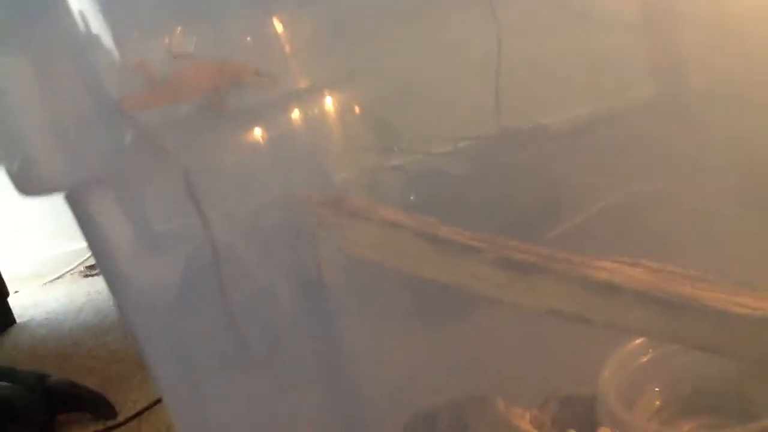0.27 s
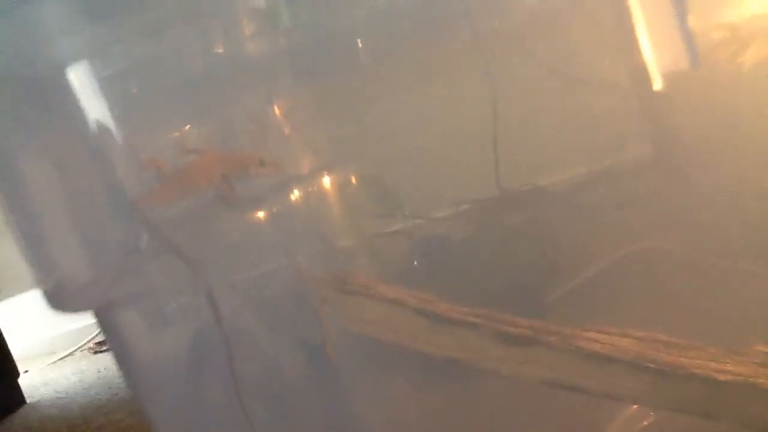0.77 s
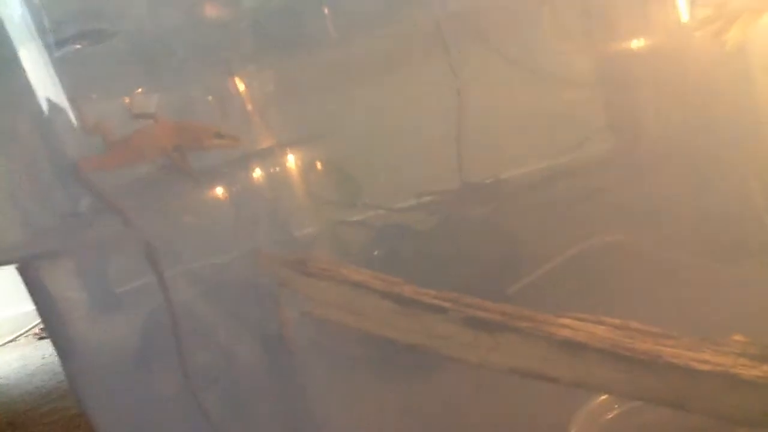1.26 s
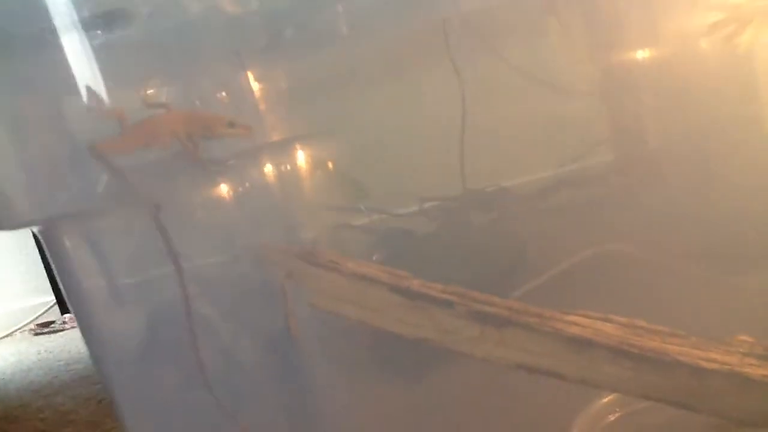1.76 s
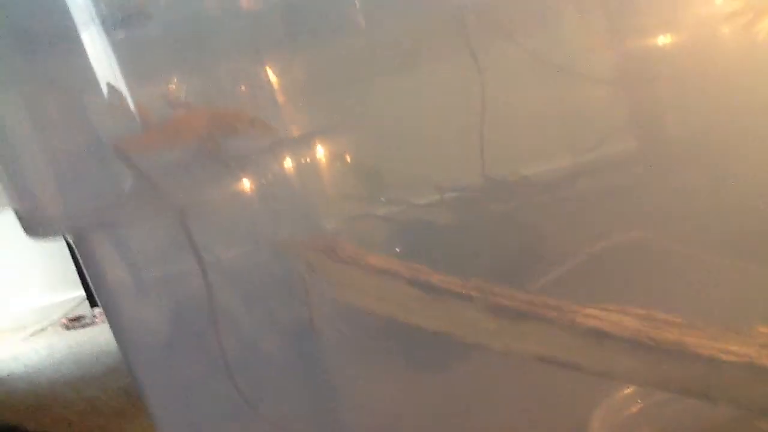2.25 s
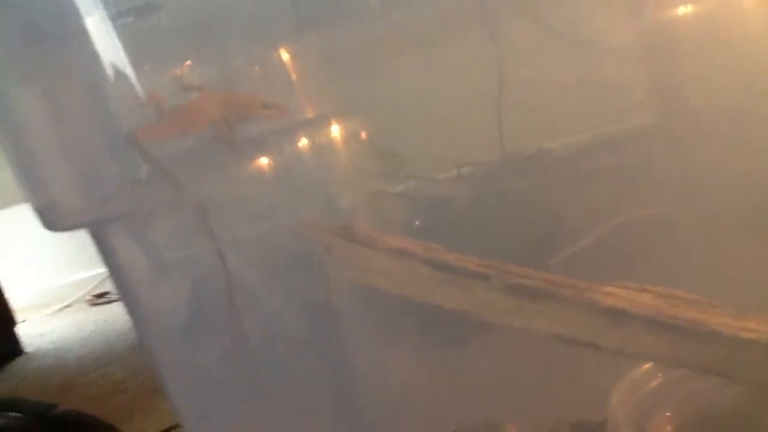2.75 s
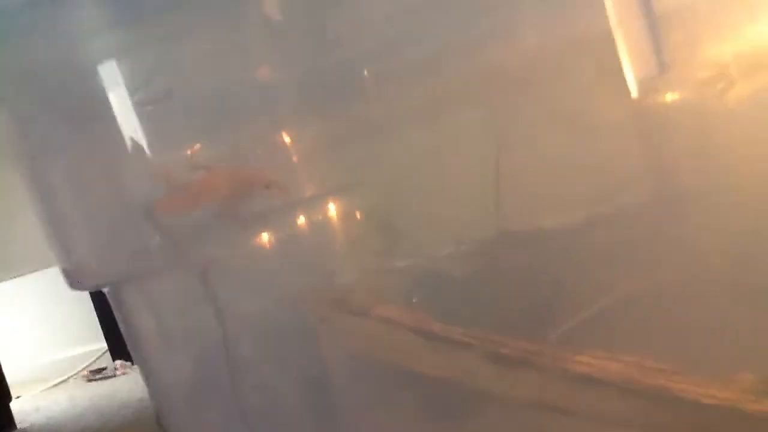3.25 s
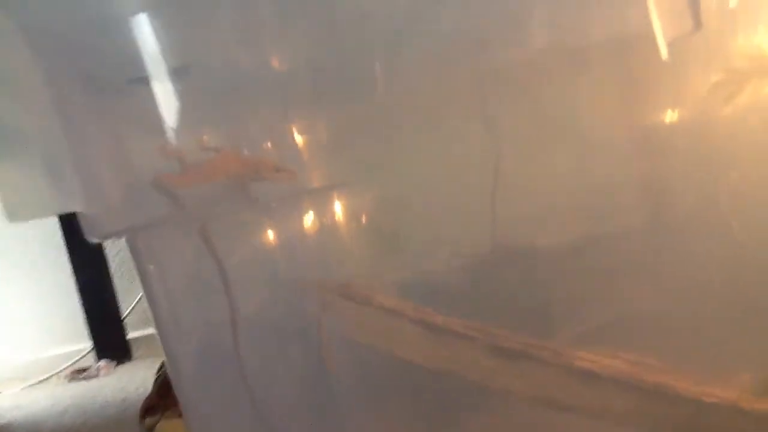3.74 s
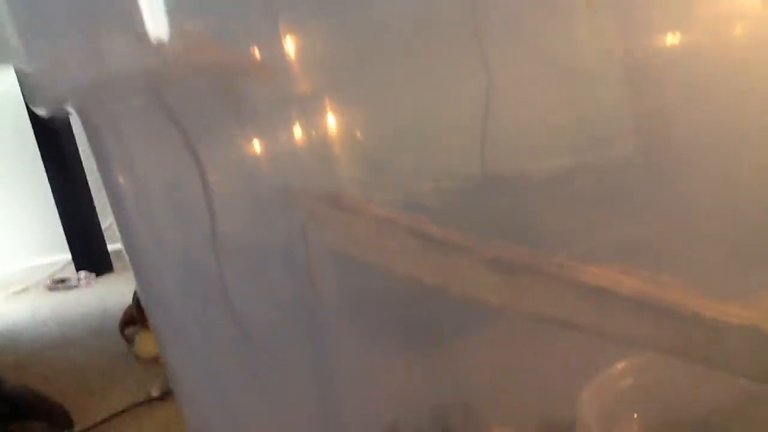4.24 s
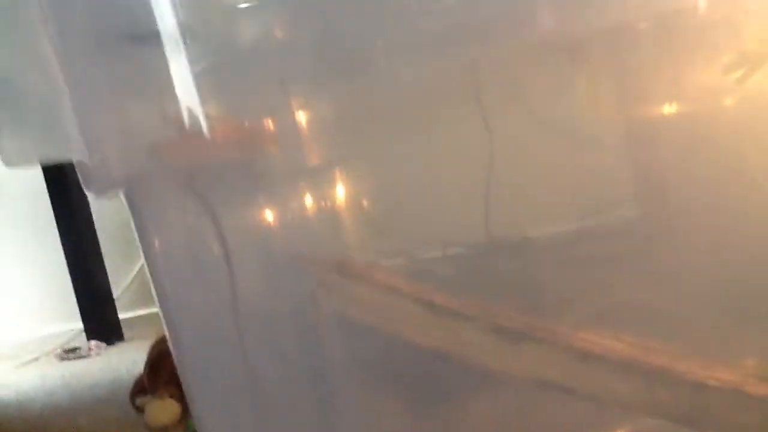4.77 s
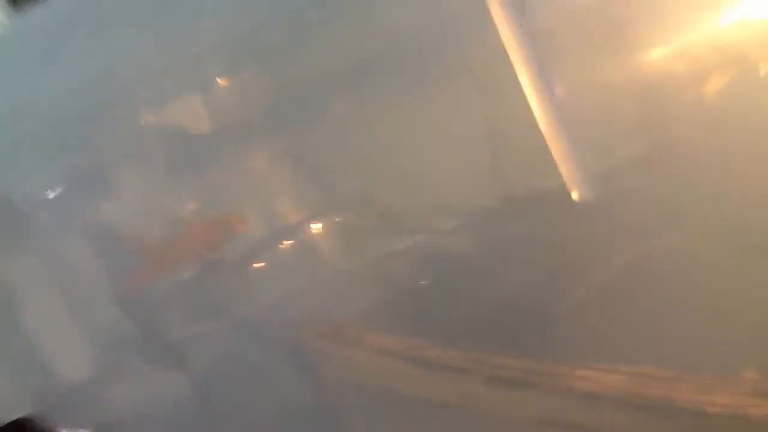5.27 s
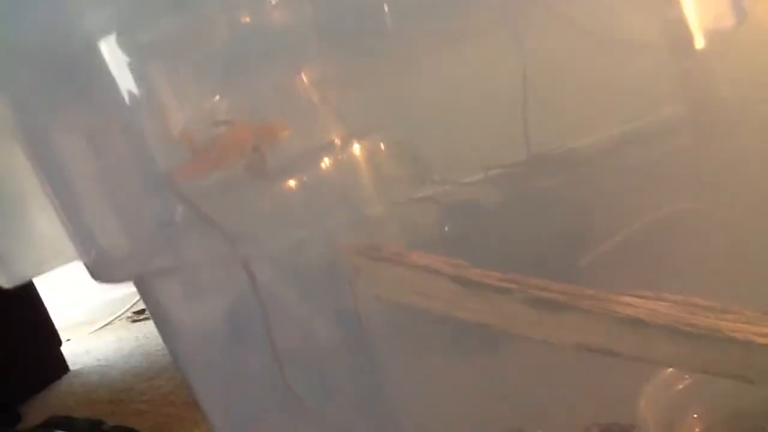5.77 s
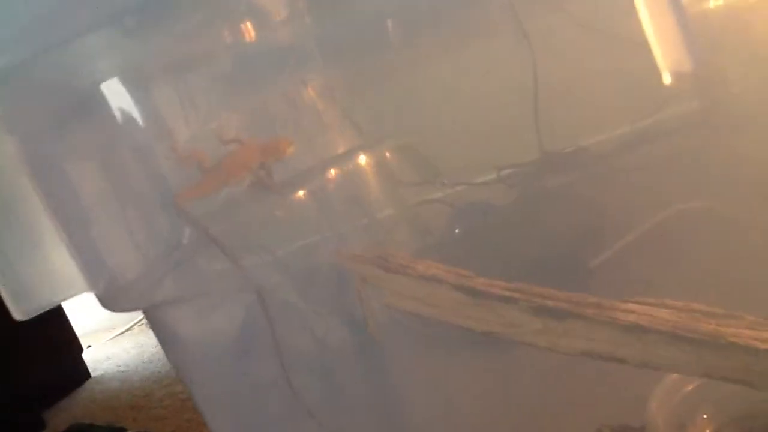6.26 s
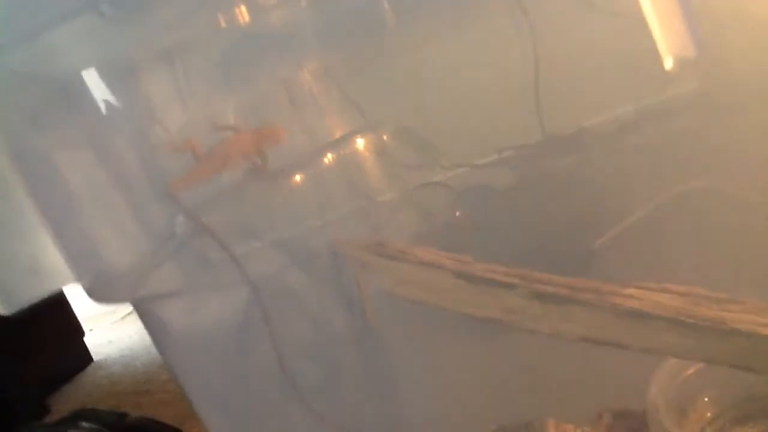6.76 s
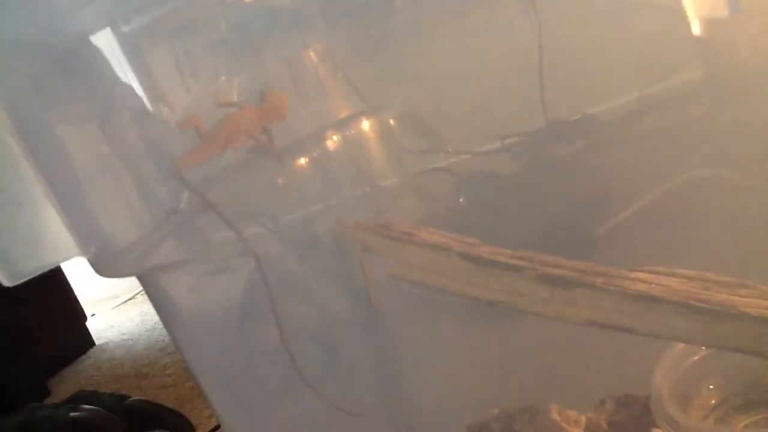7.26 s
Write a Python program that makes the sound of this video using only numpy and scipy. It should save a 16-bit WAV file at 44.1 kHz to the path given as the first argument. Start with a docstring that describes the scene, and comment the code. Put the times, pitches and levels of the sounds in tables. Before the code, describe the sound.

Very close handling noise indoors. After a nearly silent second with tiny plastic taps and two stubby groans, fingers rub the casing in uneven bassy strokes full of crackling slips and dull pops. Hard bumps land early and midway, the middle one with a swishing hiss as a finger crosses the microphone opening. Light brushing, crisper scrapes and another hard thump follow, settling to sparse thin ticks over faint room hiss.

```python
"""Quiet room hum and hiss, light taps and two groans of a finger on plastic; then fingers shift on a small
camera held against a plastic tub, indoors. Skin drags over the casing in countless tiny slips (filtered
random pulses and noise); single slips snap and the casing bumps, all ringing one low resonance.
A fingertip slides over the microphone port, so the hiss sweeps; brushes and squeaks are shaped noise."""
import sys
import numpy as np
from scipy import signal
from scipy.fft import rfft, irfft, next_fast_len
from scipy.io import wavfile
from scipy.ndimage import map_coordinates

SR = 44100
rng = np.random.default_rng(int(sys.argv[2]) if len(sys.argv) > 2 else 0)


def store_wav(level_fs):
    """Save 16-bit WAV to argv[1]."""
    pcm = np.round(np.clip(np.atleast_2d(level_fs), -1, 1) * 32767)
    wavfile.write(sys.argv[1], SR, pcm.T.astype(np.int16))


N = 331455
TIME_S = np.arange(N) / SR
CASE_HZ, CASE_Q, LEAK_HZ = 159, 2, 223  # casing resonance; high-pass leak of the push
QUIET_DB = -63  # room background, rms
TOP_HZ = 15300  # band limit

# room background spectrum: [f/Hz, relative level/dB]
QUIET_SPECTRUM = [(18, -73.5), (30, -34.5), (59, -25), (85, 0), (114, -4.5), (173, 4), (945, -12.5),
                  (1140, -12), (1680, -12.5), (2070, -12.5), (3150, -15.5), (5450, -14.5), (15500, -14)]
# the room background falls (+) or rises (-), then recovers: [t/s, nominal fall/dB, recovery (1/e)/s]
BACKGROUND_SWINGS = [(1.67, 11.5, 1.5), (4.11, -5.5, 0.18)]
# light taps on the tub wall: [t/s, relative level/dB]
WALL_TAPS = [(0.038, -47), (.422, -45.5), (.593, -45.5)]
# tub wall modes: [f/Hz, mean relative level/dB, t60/s]
WALL_MODES = [(533, 0, 0.03435), (1554, 5, 0.027), (1720, 3, 0.015), (2330, 1, 0.026), (3400, -1, .02),
              (5070, -4, 0.016)]
# fingertip judders on plastic:
# [t/s, length/s, first slip rate/Hz, last slip rate/Hz, peak/dB, fade/dB, muffling/Hz]
FINGER_GROANS = [(0.376, 0.055, 258, 183, -23, 16.5, 350), (.617, .046, 231, 179, -17.5, 10, 400)]
# low tub resonances driven by the judder: [f/Hz, width/Hz, relative level/dB]
TUB_MODES = [(228, 120, 4), (364, 320, -12)]
# blunt knocks on the casing: [t/s, peak/dB, relaxation/Hz, contact/Hz (low = soft)]
CASE_BUMPS = [(1.0845, -33.5, 1000, 302), (1.6556, -4.5, 900, 4500), (1.672, -3, 100, 500),
              (1.689, -7, 100, 405), (2.3445, -22.5, 696, 2000), (2.5992, -25.5, 200, 527),
              (2.624, -25.5, 200, 620), (2.6677, -26, 200, 527), (2.8011, -21.5, 200, 596),
              (2.83, -23, 201, 197), (3.2136, -26, 200, 150), (3.2287, -25.5, 1800, 785),
              (3.2399, -26.5, 1500, 590), (3.244, -21.5, 150, 202), (3.313, -31.5, 1507, 628),
              (3.314, -16.5, 400, 210), (3.7295, -17.5, 306, 518), (4.095, -2.5, 900, 1980),
              (4.1064, 2, 1400, 958), (4.1099, -10.5, 900, 1204), (4.3506, -22.5, 400, 1200),
              (4.443, -38.5, 1200, 1190), (4.5629, -31, 900, 1200), (5.65, -34, 100, 90),
              (6.333, -1, 900, 1330)]
# fingertip over the port, closing (-) or opening (+) the air gap; rise and fall are times for 20 dB:
# [t/s, rise/s, hold/s, fall/s, hiss/dB, gap resonance/Hz, glide/(octaves/s)]
PORT_PASSES = [(1.11, .06, 0.027, .11, -54, 13800, -12.5), (4.11, .015, .012, .03, -38.5, 7100, 38.5),
               (4.16, .03, 0.04, .1, -65, 14700, -5), (4.265, .04, .01, 0.027, -64.5, 4200, -7.5),
               (4.385, .04, 0.05, 0.038, -47.5, 6980, 22), (4.57, .06, 0.026, 0.069, -49, 12860, -8.5),
               (4.77, .11, 0.0497, 0.43, -55.5, 8000, 1.5), (5.095, 0.065, .015, 0.053, -41.5, 10100, -12)]
# strokes of skin over the casing, t = start of full pressure; rise and fall are times for 20 dB:
# [t/s, rise/s, hold/s, fall/s, rumble/dB, scrape re rumble/dB, fizz re rumble/dB]
SKIN_STROKES = [(1.201, .1, 0.063, 0.073, -49, -2.5, -10), (1.306, .05, .07, 0.12, -40, -9, -19.5),
                (1.438, .05, 0.015, .2, -28.5, -11, -23.5), (1.662, .03, 0.0081, 0.011, -19, 8, -9),
                (1.672, 0.058, 0.02, 0.029, -10, -14.5, -29.5),
                (1.713, 0.038, 0.042, 0.047, -31.5, -9, -24.5),
                (1.79, 0.055, 0.062, 0.14, -44.5, -9.5, -23.5), (2.029, 0.08, .06, 0.11, -31, -12, -26),
                (2.26, .15, 0.035, 0.33, -29.5, -11.5, -26), (2.622, 0.041, 0.1525, 0.15, -48.5, -11, -25),
                (2.787, 0.067, 0.045, 0.023, -38, -8.5, -21), (2.86, 0.09, 0.013, 0.33, -52.5, -31, -30),
                (3.048, 0.0264, 0.037, 0.16, -36.5, -8.5, -19.5),
                (3.14, 0.12, 0.091, 0.025, -48, -6.5, -23.5), (3.323, 0.033, 0.046, 0.079, -41, -17, -32),
                (3.482, .2, 0.015, 0.12, -46, -32, -45), (3.79, 0.14, .01, .12, -49.5, -20, -26.5),
                (3.9, 0.22, .11, 0.14, -56.5, -15.5, -26), (4.04, .03, 0.035, .03, -43, -25, -28.5),
                (4.114, 0.036, 0.0056, 0.023, -22.5, -9, -20),
                (4.266, 0.029, 0.023, 0.039, -33, -12, -28.5),
                (4.324, 0.069, 0.029, 0.03, -33.5, -20, -41.5), (4.35, .01, 0.015, 0.082, -40.5, -3, -11),
                (4.56, 0.017, 0.0397, 0.116, -52, -1.5, -12.5), (4.754, 0.031, 0.042, 0.14, -57, -4.5, -8),
                (5.102, 0.045, 0.0078, .12, -46, 4, -1), (5.218, 0.03, 0.016, 0.048, -32, -4.5, -12),
                (5.41, 0.095, 0.048, 0.038, -42.5, -5.5, -13), (5.533, .2, 0.4, 0.24, -51, -3, -10.5),
                (5.992, 0.16, 0.041, .25, -48, -1.5, -11), (6.183, .1, 0.044, 0.22, -42, -3, -8.5),
                (6.325, .07, 0.023, .05, -29, -7, -16.5), (6.368, .04, 0.038, 0.034, -18, -14.5, -29.5),
                (6.597, .15, .03, 0.098, -30, -7.5, -16.5), (6.66, .1, 0.015, 0.15, -39.5, -6, -6.5),
                (6.88, .1, 0.04, 0.062, -49.5, -7.5, -3.5), (6.966, .1, .12, 0.32, -71, -4.5, 7),
                (7.35, 0.16, .16, 0.13, -64, -1.5, 1)]
# skin drag spectrum: [f/Hz, relative level/dB]
SKIN_SPECTRUM = [(15, -52.5), (25, -34), (48, -26), (80, -14), (119, -4), (188, -1), (246, -3.5),
                 (274, -2.5), (331, -5), (457, -9), (741, -14), (804, -15.5), (1270, -20.5), (6210, -39),
                 (13200, -52.5), (15500, -43.5)]
# single slips that snap, from faint ticks to loud pops:
# [t/s, relative level/dB, relaxation/Hz (low = thick pop, high = thin tick)]
PLACED_SNAPS = [(1.1158, -37.5, 4000), (1.1331, -35.5, 4000), (1.2049, -23.5, 4000), (1.2336, -24, 2590),
                (1.2437, -29.5, 1100), (1.3254, -27, 750), (1.3664, -9, 283), (1.5121, -20, 330),
                (1.5356, -18.5, 150), (1.575, -23.5, 750), (1.5815, -24, 500), (1.6277, -5.5, 150),
                (1.7629, -0.5, 540), (1.7827, -30, 750), (1.842, -28.5, 499), (1.8529, -28, 330),
                (1.8711, -5, 283), (1.995, -18.5, 250), (2.1126, -23, 736), (2.2109, -21.5, 150),
                (2.2381, -22, 150), (2.297, -19, 150), (2.3576, -23.5, 497), (2.3681, -23.5, 500),
                (2.4264, -21, 330), (2.4704, -25, 150), (2.4871, -28.5, 330), (2.5171, -19.5, 223),
                (2.5996, -24, 148), (2.6683, -25, 150), (2.7635, -17, 500), (2.8008, -12, 222),
                (2.8351, -27.5, 150), (3.0112, -30, 300), (3.0241, -14, 220), (3.0414, 0, 365),
                (3.0569, -8, 350), (3.0841, -18.5, 330), (3.0966, -23.5, 220), (3.1784, -23, 334),
                (4.1258, -9.5, 2500), (4.4281, -28.5, 4000), (4.5629, -42, 152.5), (5.1119, -20, 4000),
                (5.2449, -13.5, 770), (5.2584, -16, 745), (5.2719, -18.5, 1700), (5.2842, -21, 2570),
                (5.3812, -13.5, 1010), (5.4046, -8, 750), (5.4081, -12.5, 1120), (5.4302, -19.5, 750),
                (5.4718, -17.5, 750), (5.638, -24.5, 520), (5.7828, -12, 740), (5.8196, -26, 500),
                (5.8295, -26, 498), (5.9006, -22, 330), (6.0137, -29, 1100), (6.0346, -26.5, 1100),
                (6.2228, -19.5, 750), (6.2675, -23, 1700), (6.3186, -17.5, 2600), (6.5059, -23, 1700),
                (6.5209, -22, 500), (6.5589, -19, 1100), (6.8165, -30.5, 1685), (7.2438, -34.5, 3970),
                (7.3451, -33.5, 4000), (7.3656, -30.5, 2600), (7.4658, -29, 2630)]
# skin brushes near the hollow of the hand: [t/s, rise/s, hold/s, fall/s, level/dB]
HAND_BRUSHES = [(4.158, 0.037, 0.099, 0.13, -64.5), (4.603, .1, 0.12, 0.21, -68),
                (4.773, 0.14, 0.12, .33, -61.5)]
# hollow of the hand around the port: [f/Hz, width/Hz, mean relative level/dB]
HOLLOW_MODES = [(1400, 730, -1.5), (1950, 680, -2.5), (3560, 770, -3)]
# thin squeaks of skin: [t/s, rise/s, hold/s, fall/s, level/dB, pitch/Hz]
SKIN_SQUEAKS = [(4.189, 0.019, .01, .06, -56, 3900), (4.473, 0.032, 0.069, .04, -70, 1376)]


def amp(db):
    """Decibels to gain."""
    return 10 ** (np.asarray(db) / 20)


def unit(x):
    """Scale to rms 1."""
    return x / np.sqrt(np.mean(x ** 2) + 1e-20)


def shape(points, hz):
    """Gain of (Hz, dB) points on a log axis."""
    f, db = np.transpose(points)
    return amp(np.interp(np.log(hz + 1), np.log(f + 1), db))


def coloured(x, gain):
    """Causal (minimum-phase) filter with the given gain of frequency, via the folded cepstrum."""
    m = 2 * next_fast_len(N // 2 + 8192)
    cepstrum = irfft(np.log(np.maximum(gain(np.fft.rfftfreq(m, 1 / SR)), 1e-6)))
    cepstrum[1:m // 2] *= 2
    cepstrum[m // 2 + 1:] = 0
    return irfft(rfft(x, m) * np.exp(rfft(cepstrum)))[:N]


def wobble(rate_hz):
    """A smooth random curve, rate_hz knots a second."""
    return map_coordinates(rng.standard_normal(int(N * rate_hz / SR) + 4), [TIME_S * rate_hz])


def add(track, s, sound):
    """Mix a sound in at time s."""
    part = track[max(round(s * SR), 0):][:len(sound)]
    part += sound[:len(part)]


def swell(s, rise_s, hold_s, fall_s, db):
    """Gain of one touch: it builds, holds and lets go, by 20 dB in each rise or fall time."""
    away = np.maximum(s - TIME_S, 0) / rise_s + np.maximum(TIME_S - s - hold_s, 0) / fall_s
    return amp(db - 20 * np.minimum(away, 10))


def together(gains):
    """Overlapping touches add in power."""
    return np.sqrt(sum(g ** 2 for g in gains))


def floor(onset_s=.05):
    """Quiet room hum and hiss; each level swing sets in quickly and recovers exponentially."""
    fall_db = np.zeros(N)
    for s, depth_db, recovery_s in BACKGROUND_SWINGS:
        onset = np.clip((TIME_S - s) / onset_s, 0, 1)
        fall_db += depth_db * onset * np.exp(-np.maximum(TIME_S - s, 0) / recovery_s)
    noise = coloured(rng.standard_normal(N), lambda hz: shape(QUIET_SPECTRUM, hz))
    return amp(QUIET_DB - fall_db) * unit(noise)


def taps():
    """A light touch rings the tub wall's modes briefly, with a burst of noise."""
    track, t = np.zeros(N), TIME_S[:SR // 10]
    for s, db in WALL_TAPS:
        ring = np.zeros(len(t))
        for hz, mode_db, t60_s in WALL_MODES:
            ring += amp(mode_db + rng.normal(0, 2) - 60 * t / t60_s) * np.sin(2 * np.pi * hz * t)
        burst = 0.73 * amp(-60 * t / .02) * rng.standard_normal(len(t))
        add(track, s, amp(db - 10.5) * (ring + burst))
    return track


def groans():
    """Uneven stick-slip pulses slow as the fingertip comes to rest; soft skin muffles them, the tub rings."""
    track, t = np.zeros(N), TIME_S[:SR // 8]
    for s, length_s, first_hz, last_hz, db, fade_db, muffle_hz in FINGER_GROANS:
        uneven = 1 + .13 * wobble(250)[:len(t)]
        turns = np.cumsum(np.interp(t, [0, length_s], [first_hz, last_hz]) * uneven) / SR
        grip = np.clip(np.minimum(.5 + t / .02, (length_s - t) / .008), 0, 1)
        strength = grip * amp(2.4 * wobble(161)[:len(t)] - fade_db * t / length_s)
        pulses = np.diff(np.floor(turns), prepend=-1) * strength
        band = signal.butter(4, [110, muffle_hz], 'band', fs=SR, output='sos')
        muffled = signal.sosfilt(band, pulses)
        groan = np.zeros(len(t))
        for hz, width_hz, mode_db in TUB_MODES:
            groan += amp(mode_db) * signal.lfilter(*signal.iirpeak(hz, hz / width_hz, fs=SR), muffled)
        add(track, s, amp(db) * groan / np.abs(groan).max())
    return track


def room(x, t60_s=.4):
    """The small room's faint answer: a decaying noise tail."""
    t = TIME_S[:SR // 2]
    tail = rng.standard_normal(len(t)) * amp(-60 * t / t60_s) * (t > .006)
    return signal.fftconvolve(x, tail / np.linalg.norm(tail))[:N]


def casing(relax_hz):
    """A sudden push relaxes, rings the casing and leaks away; peak near 1."""
    push = np.exp(-2 * np.pi * relax_hz * TIME_S[:SR // 20])
    w = 2 * np.pi * CASE_HZ
    ring = signal.lfilter(*signal.bilinear([1, 0, 0], [1, w / CASE_Q, w * w], SR), push)
    return signal.lfilter(*signal.butter(1, LEAK_HZ, 'high', fs=SR), ring)


def bumps():
    """A blunt contact rounds the step off, leaving a thud."""
    track, t = np.zeros(N), TIME_S[:SR // 50]
    for s, db, relax_hz, contact_hz in CASE_BUMPS:
        thud = np.convolve(casing(relax_hz), t ** 2 * np.exp(-2 * np.pi * contact_hz * t))
        add(track, s, amp(db) * thud / np.abs(thud).max())
    return track


def slips(rate_hz, spread_db, smooth):
    """Random micro-slips of very unequal size over a smooth drag; rms 1."""
    sizes = amp(spread_db * np.clip(rng.standard_normal(N), -2, 2)) * rng.choice([-1, 1], N)
    train = unit(sizes * (rng.random(N) < rate_hz / SR))
    return unit(train + smooth * rng.standard_normal(N))


def port_hiss(width=0.21, upper_ratio=2.0, upper_db=-3, lowest_hz=3500, highest_hz=15800):
    """The gap under the fingertip has two resonances: the narrower it is, the lower the hiss."""
    gains = np.array([swell(*row[:5]) for row in PORT_PASSES])
    # the loudest pass sets the pitch, gliding evenly in octaves within limits
    s, *_, centre_hz, glide = np.array(PORT_PASSES)[gains.argmax(axis=0)].T
    octaves = np.clip(glide * (TIME_S - s), -2, 2)
    gap_hz = np.clip(centre_hz * 2 ** octaves, lowest_hz, highest_hz)
    hz, t, z = signal.stft(slips(rate_hz=700, spread_db=6, smooth=.6), SR, nperseg=256)
    ratio = hz[:, None] / np.interp(t, TIME_S, gap_hz)
    peak = lambda r: 1 / (1 + ((r - 1) / width) ** 2)
    gain = peak(ratio) + amp(upper_db) * peak(ratio / upper_ratio)
    gain /= np.sqrt(np.mean(gain ** 2, axis=0))
    return together(gains) * signal.istft(z * gain, SR, nperseg=256)[1][:N]


def stroke_levels():
    """Rumble, scrape and fizz in dB; each stroke drives all three with one envelope."""
    power = np.zeros((3, N))
    for *touch, scrape_db, fizz_db in SKIN_STROKES:
        power += amp([[0], [scrape_db], [fizz_db]]) ** 2 * swell(*touch) ** 2
    return 10 * np.log10(power)


def rubbing(levels_db, low_hz=500, high_hz=3000, muffled_hz=300, dull_from_db=-11, dull_range_db=12,
            flutter_db=0.07, ring_width_hz=30, boom_share=0.43, boom_from_db=-33):
    """Tiny slips feed rumble, scrape and fizz; a hard drag merges them into a rush."""
    rumble_db, scrape_db, fizz_db = levels_db
    merged = np.clip((fizz_db + 54.5) / 22, 0, 1)
    sparse = slips(rate_hz=600, spread_db=5, smooth=.65)
    dense = slips(rate_hz=3000, spread_db=4, smooth=.7)
    drag = np.sqrt(1 - merged) * sparse + np.sqrt(merged) * dense
    drag = drag * amp(flutter_db * wobble(60))
    # the soft pad of the finger adds an even drag, heard only in the rumble
    pad = drag + 1.3 * rng.standard_normal(N)
    m = next_fast_len(N)
    hz = np.fft.rfftfreq(m, 1 / SR)
    crisp, soft = [rfft(coloured(v, lambda f: shape(SKIN_SPECTRUM, f)), m) for v in (drag, pad)]
    below = lambda edge_hz: 1 / (1 + (hz / edge_hz) ** 6)
    layer = lambda spectrum: unit(irfft(spectrum, m)[:N])
    # a stroke with little scrape is all finger pad, which muffles the rumble too
    dull = np.clip((dull_from_db - scrape_db + rumble_db) / dull_range_db, 0, 1)
    body = (1 - dull) * layer(soft * below(low_hz)) + dull * layer(soft * below(muffled_hz))
    # the hardest pushes set the casing booming at its resonance
    boom = layer(soft / (1 + ((hz - CASE_HZ) / ring_width_hz) ** 2))
    share = boom_share * np.clip((rumble_db - boom_from_db) / 20, 0, 1)
    rumble = (1 - share) * body + share * boom
    scrape = layer(crisp * (below(high_hz) - below(low_hz)))
    fizz = layer(crisp * (1 - below(high_hz)))
    return amp(rumble_db) * rumble + amp(scrape_db) * scrape + amp(fizz_db) * fizz


def random_snaps(scrape_db, count=170, over_db=13, spread_db=5.5, loudest_db=-25,
                 relax_hz=600, spread_octaves=1):
    """Further snaps come at random and grow with the scrape: rows like those of the placed ones."""
    rows = []
    for when, size, colour in zip(rng.integers(N, size=count), *rng.standard_normal((2, count))):
        db = min(scrape_db[when] + over_db + spread_db * size, loudest_db)
        rows.append((when / SR, db, relax_hz * 2 ** (spread_octaves * colour)))
    return rows


def snaps(rows, level_db=2.0, edge_hz=2200, thin_edge=6, rounding=0.18):
    """Each slip is a step of force on the casing; small thin ticks have the sharpest edge."""
    track = np.zeros(N)
    for s, db, relax_hz in rows:
        corner_hz = (edge_hz + thin_edge * relax_hz) * amp(-rounding * (db + 34))
        keep = np.exp(-2 * np.pi * corner_hz / SR)
        snap = signal.lfilter([1 - keep], [1, -keep], casing(relax_hz))
        add(track, s, amp(db + level_db) * snap)
    return track


def brushing():
    """Light brushing is coloured by the hollow of the hand, whose resonances come and go."""
    modes = np.zeros(N)
    for centre_hz, width_hz, db in HOLLOW_MODES:
        level = amp(db + 2 * wobble(8))
        peak = lambda hz: 1 / (1 + (2 * (hz - centre_hz) / width_hz) ** 2)
        modes += level * coloured(rng.standard_normal(N), peak)
    return together(swell(*row) for row in HAND_BRUSHES) * unit(modes)


def squeak(width=.03, second_ratio=.77, second_db=-14):
    """Light fast slipping sings in a narrow band of noise, with a weaker one below it."""
    peak = lambda hz, centre_hz: 1 / (1 + ((hz / centre_hz - 1) / width) ** 2)
    track = np.zeros(N)
    for *touch, pitch_hz in SKIN_SQUEAKS:
        gain = lambda hz: peak(hz, pitch_hz) + amp(second_db) * peak(hz, second_ratio * pitch_hz)
        track += swell(*touch) * unit(coloured(rng.standard_normal(N), gain))
    return track


def scene():
    """Contact sounds reach the microphone directly; tub and, fainter, knocks also sound into the room."""
    levels_db = stroke_levels()
    tub = groans() + taps()
    knocks = snaps(PLACED_SNAPS + random_snaps(levels_db[1])) + bumps()
    skin = rubbing(levels_db) + port_hiss() + brushing() + squeak()
    answer = room(amp(-24) * tub + amp(-42.0) * knocks)
    return (skin + knocks + tub + answer + floor())[None]


def record(dry, ceiling=0.62):
    """Peaks are rounded off and nothing is kept above the band limit."""
    rounded = dry / (1 + np.abs(dry / ceiling) ** 6) ** (1 / 6)
    m = next_fast_len(N + SR // 10)
    return irfft(rfft(rounded, m) * (np.fft.rfftfreq(m, 1 / SR) < TOP_HZ), m)[..., :N]


dry = scene()
out = record(dry)
store_wav(out)
```